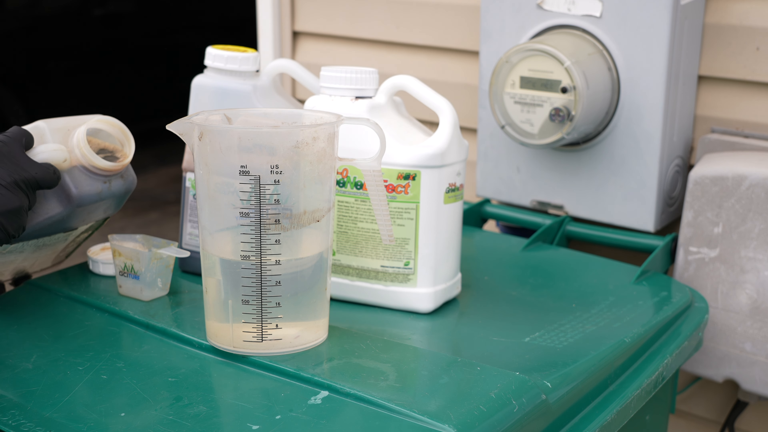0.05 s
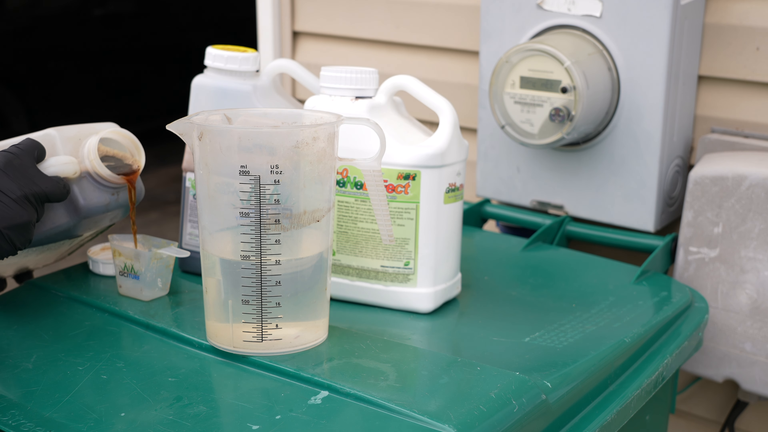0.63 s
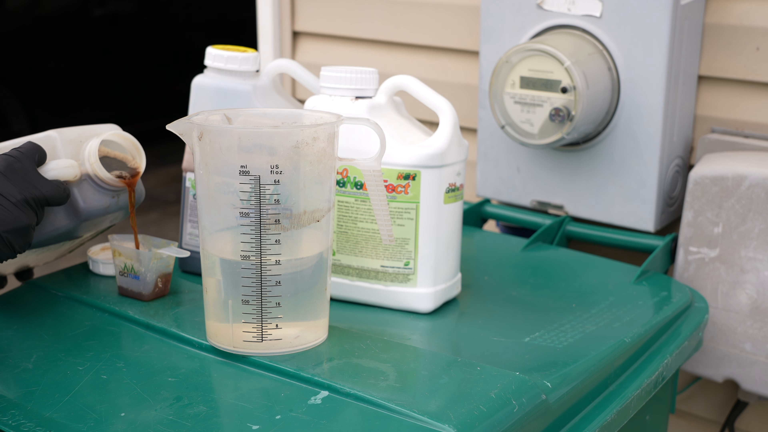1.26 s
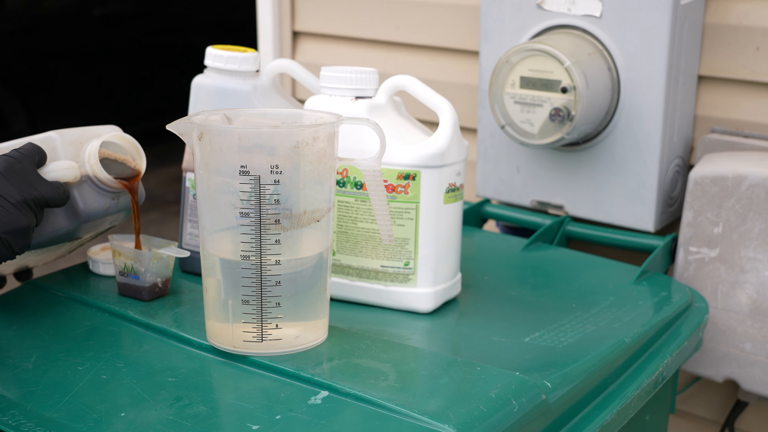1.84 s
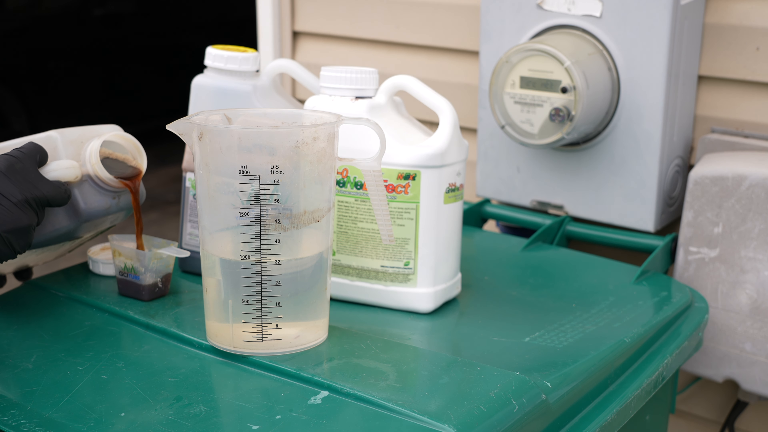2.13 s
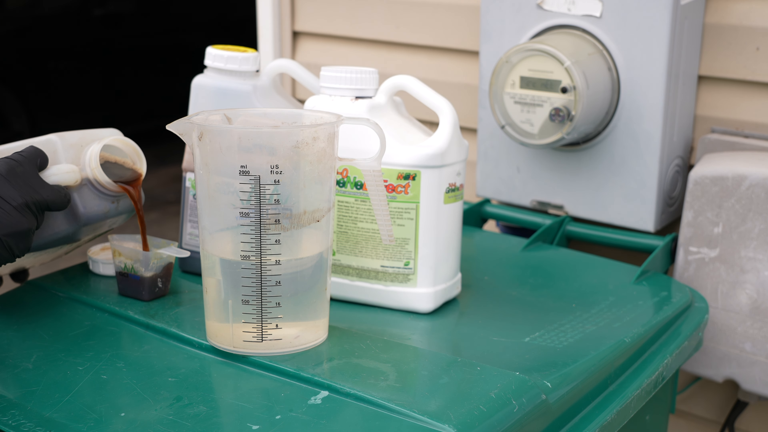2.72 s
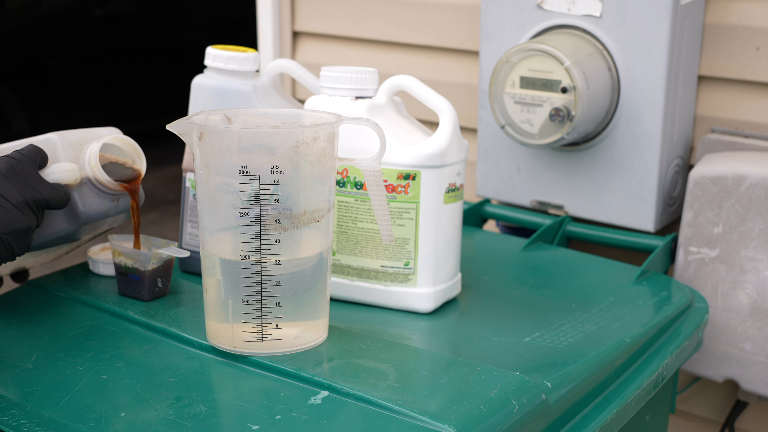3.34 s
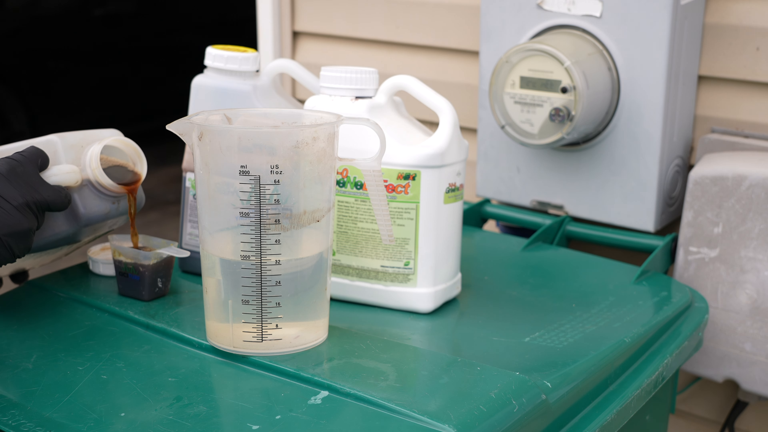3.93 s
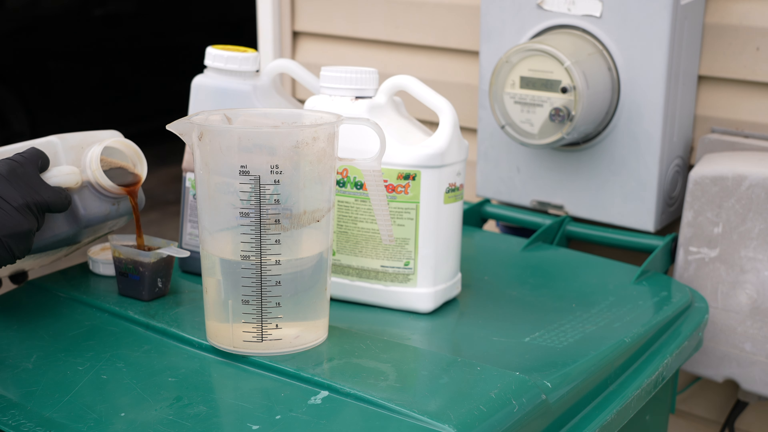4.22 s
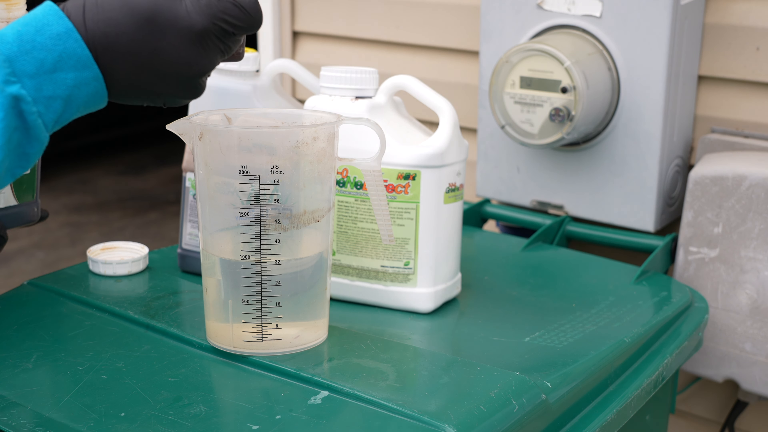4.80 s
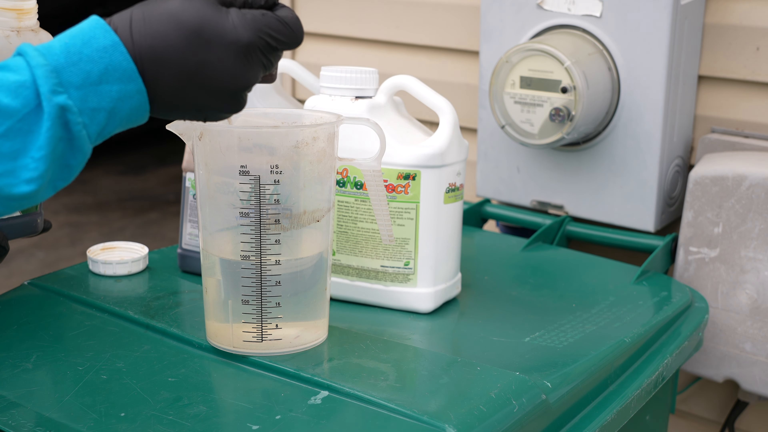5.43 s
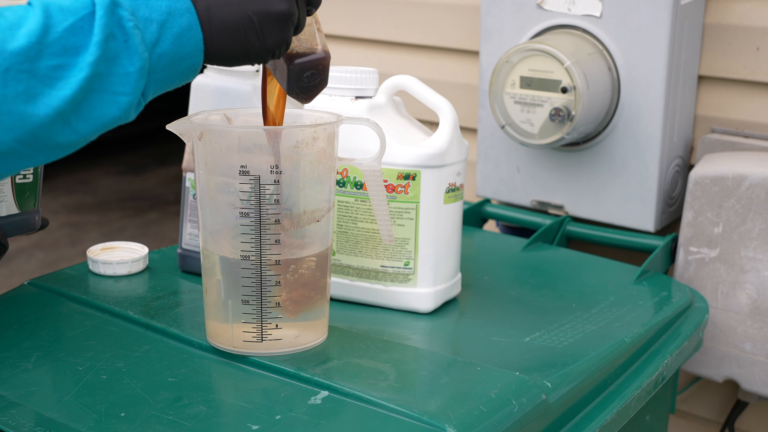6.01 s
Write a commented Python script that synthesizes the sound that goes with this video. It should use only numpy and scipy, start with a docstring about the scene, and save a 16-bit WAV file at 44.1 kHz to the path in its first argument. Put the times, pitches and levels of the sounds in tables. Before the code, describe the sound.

Close to the microphone, liquid runs from a bottle into a small plastic cup, splashing and bubbling at first, then trickling more quietly as the cup fills. Plastic knocks lightly a few times. The pour stops, and after a short pause the cupful is tipped into a jug of water with a plop and a brief splash. Outdoors, a machine hums low and wind rumbles on the microphone.

```python
"""Pouring into a plastic cup, outdoors

Close to the microphone, a dark liquid runs from a bottle into a small plastic cup on a bin lid.
The stream traps bubbles that ring the cup, splashing at first and quieter as it fills.
Then the cup is tipped into a jug of water, where a big air pocket closes with a plop.
A machine hums nearby and wind rumbles on the microphone."""
import sys
import numpy as np
from scipy import signal
from scipy.fft import rfft, irfft
from scipy.io import wavfile
from scipy.ndimage import uniform_filter1d

SR = 44100
rng = np.random.default_rng(int(sys.argv[2]) if len(sys.argv) > 2 else 0)


def wav_out(sig):
    """Save sig, one row per channel (or a flat mono array), as 16-bit PCM at SR to the path in sys.argv[1]."""
    wavfile.write(sys.argv[1], SR, np.round(np.clip(np.atleast_2d(sig).T, -1, 1) * 32767).astype(np.int16))


N = 271611
TIME = np.arange(N) / SR
TOP_HZ = 15900
DEEP_S = 2.01  # from here the liquid is deep enough to cushion the stream

# How hard the stream churns the cup. Each row: time in seconds, relative level in dB.
FLOW = [(1.11, -18), (1.15, -13), (1.3, -13), (1.35, -8), (1.49, -8), (1.63, -3), (1.71, -13), (1.83, -2.5),
        (1.89, -7), (1.98, -2.5), (2.25, -6), (2.65, -4.5), (3.05, -14.5), (3.5, -13), (3.9, -9.5),
        (4.15, -13.5), (4.47, -7), (4.53, -2.5), (4.63, -14)]
def trickle(sputter_db=4.0, wake_db=-30.5, cushion_db=-10, cushion_s=0.11):
    """Close up, bubbles ring the cup between deep glugs and fine spray; all sputter with the stream."""
    large = evened(in_cup(swarm(max_per_s=1400, hz=1618, octaves=.445, cycles=2.44, uneven_db=3.5)))
    small = evened(in_cup(swarm(max_per_s=1400, hz=3400, octaves=.38, cycles=1, uneven_db=4)))
    spray = swarm(max_per_s=500, hz=7600, octaves=.55, cycles=1, uneven_db=5.5)
    glugs = swarm(max_per_s=300, hz=874, octaves=.26, cycles=2.3, uneven_db=4)
    sputter = evened(gain_of(sputter_db * drift(70)))
    flow, pouring = level(FLOW), gate(FLOW[0][0], FLOW[-1][0])
    # each slap leaves a dying wake of bubbles
    wake = bursts([(s, 0, db + wake_db) for s, db, _, _ in SPLATS], attack_s=0.0012, release_s=0.039)
    cushion = gain_of(cushion_db * (1 + np.tanh((TIME - DEEP_S) / cushion_s)) / 2)
    glugs *= np.hypot(gain_of(-70) * flow ** 2.1 * pouring, gain_of(-9) * wake)
    large *= np.hypot(gain_of(-63) * flow, wake)
    small *= np.hypot(gain_of(-66) * flow ** 0.74 * pouring, gain_of(-26) * wake)
    spray *= np.hypot(gain_of(-71.5) * flow ** 0.44 * pouring, gain_of(3) * wake)
    return sputter * (glugs + large + small + cushion * spray)


def gurgle():
    """Rounder bubbles ring long enough to have a pitch; in deep liquid, fine ones crackle over them."""
    large = evened(in_cup(swarm(max_per_s=320, hz=1550, octaves=.55, cycles=4, uneven_db=3)))
    fine = evened(in_cup(swarm(max_per_s=380, hz=3300, octaves=.42, cycles=2.2, uneven_db=3.5)))
    flow, deep = level(FLOW), gate(DEEP_S, FLOW[-1][0])
    return gain_of(-62) * flow * large + gain_of(-69) * flow ** .6 * deep * fine


# The stream breaks up most in mid-pour. Each row: time in seconds, share of bubbles that form.
CHURN = [(1.2, 0.76), (1.9, 0.77), (2.6, 1), (3.1, 0.58), (4.6, 0.6), (5.9, 0.95)]
def swarm(max_per_s, hz, octaves, cycles, uneven_db, count=9000):
    """A crowd of bubbles of random size and pitch, which the flow feeds at an even power."""
    gaps, sizes = rng.exponential(1, (2, count))
    detunes, rings = rng.standard_normal((2, count))
    times = np.cumsum(gaps) / max_per_s
    pitches = hz * 2 ** (octaves * detunes)
    formed = (rng.random(count) < np.interp(times, *np.transpose(CHURN))) & (times < N / SR)
    out = np.zeros(N)
    for s, size, pitch, ring in np.transpose([times, sizes, pitches, rings])[formed]:
        if pitch < TOP_HZ:
            add(out, s, gain_of(uneven_db * min(size, 2.6)) * bubble(pitch, cycles * 2 ** (ring / 2)))
    power = abs(uniform_filter1d(out ** 2, size=SR // 12))
    return out / np.sqrt(power + 1e-9)


def bubble(hz, cycles):
    """A trapped bubble swells in a few cycles, rises a little in pitch and is cut short as it bursts."""
    swell_cycles = cycles + hz * 0.00052  # the tiniest bubbles ring for more cycles
    turns = np.arange(int(4 * swell_cycles / hz * SR) + 2) * hz / SR
    age = turns / swell_cycles
    envelope = age * np.exp((1 - age ** 2) / 2)
    return envelope * np.sin(2 * np.pi * turns * (1 + .004 * (age - 2)))


# The clearest bubbles at the microphone. Each row: start in seconds, peak level in dB, pitch in Hz.
BUBBLES = [(.784, -53, 6890), (0.875, -44, 3580), (0.959, -49.5, 4140), (1.034, -49, 3620),
           (1.134, -48.5, 4500), (1.173, -49, 3700), (1.194, -52, 1400), (1.21, -57, 3600),
           (1.233, -53.5, 3600), (1.292, -56, 1410), (1.331, -44.5, 1570), (1.341, -47, 1480),
           (1.353, -45.5, 1610), (1.357, -48, 5300), (1.388, -43.5, 1570), (1.391, -43, 3180),
           (1.426, -43, 3410), (1.52, -47, 1390), (1.528, -38.5, 1580), (1.571, -43.5, 1390),
           (1.584, -50, 1520), (1.606, -45, 1720), (1.614, -41.5, 1500), (1.662, -44.5, 1650),
           (1.687, -48.5, 3700), (1.759, -41.5, 1500), (1.762, -50.5, 1020), (1.797, -46, 1780),
           (1.811, -42.5, 1140), (1.816, -44, 945), (1.822, -40, 1590), (1.838, -51, 3480),
           (1.87, -45, 1380), (1.875, -42.5, 3100), (1.9, -49, 1450), (1.922, -43, 1450), (1.935, -52, 860),
           (1.978, -51, 770), (1.966, -49, 1450), (1.967, -51.5, 6140), (1.983, -39, 1800),
           (2.107, -41, 1850), (2.15, -47.5, 3230), (2.183, -44.5, 1510), (2.213, -46, 1460),
           (2.252, -45.5, 1850), (2.278, -50, 1790), (2.306, -45, 1610), (2.334, -40.5, 1770),
           (2.645, -43.5, 3400), (2.669, -48, 3400), (3.161, -52, 1760), (3.472, -55.5, 1070),
           (3.498, -55.5, 5960), (3.554, -51.5, 1800), (3.576, -52, 3820), (3.749, -49.5, 2260),
           (3.811, -51, 1880), (4.017, -51.5, 1520), (4.406, -50, 3340), (4.507, -46, 3170),
           (4.532, -54, 1520), (5.932, -52, 2810), (5.94, -45.5, 1720), (5.94, -48, 3050),
           (5.944, -39, 1900), (5.958, -50, 2670), (5.969, -50, 4040), (5.988, -53, 1590),
           (5.999, -52, 1590), (6.023, -47.5, 1700), (6.035, -49, 1770), (6.039, -48, 3530),
           (6.054, -49, 3660), (6.061, -50.5, 6600), (6.08, -53, 1690), (6.092, -61, 2640),
           (6.135, -54, 1620)]
def single_bubbles():
    """Single bubbles stand out of the trickle and ring the vessel."""
    out = np.zeros(N)
    for s, db, hz in BUBBLES:
        add(out, s, gain_of(db) * in_vessel(bubble(hz, cycles=1.94), s))
    return out


# The stream breaks and slaps the liquid.
# Each row: start in seconds, peak level in dB, middle pitch in Hz, spread of the shower in seconds.
SPLATS = [(0.955, -55.5, 7030, 0.0035), (0.983, -55.5, 4700, 0.0027), (0.996, -54.5, 5640, .006),
          (1.132, -50, 5570, .004), (1.143, -50.5, 4640, 0.0039), (1.195, -57.5, 5370, 0.011),
          (1.33, -43.5, 6020, .005), (1.385, -45, 4840, .004), (1.424, -45, 6580, 0.0017),
          (1.519, -42.5, 5920, 0.0054), (1.57, -43.5, 5000, 0.0043), (1.585, -52, 6100, 0.0025),
          (1.607, -56, 7000, 0.0078), (1.757, -43.5, 3700, .003), (1.779, -42, 6280, 0.0046),
          (1.81, -42, 3070, 0.0034), (1.849, -50.5, 3550, .004), (1.872, -46, 2680, 0.0031),
          (1.943, -46.5, 3600, 0.0031), (2.005, -46.5, 4050, 0.0029), (2.28, -47.5, 2950, 0.0035),
          (2.332, -46, 3170, .002), (2.464, -43.5, 3400, 0.0053), (2.509, -46.5, 2800, 0.003),
          (2.644, -45, 2060, 0.0028), (2.788, -45, 2630, 0.0029), (2.823, -50, 2920, .003),
          (2.863, -51.5, 3270, 0.0046), (2.95, -54, 2400, 0.0036), (3.167, -50.5, 3100, .004),
          (3.368, -56, 2550, 0.0047), (3.433, -51.5, 2290, 0.0042), (3.484, -52.5, 3320, .003),
          (3.585, -50.5, 3070, .004), (3.746, -54, 3550, 0.0021), (3.782, -53, 2470, 0.0057),
          (3.888, -55.5, 2340, .008), (4.381, -57, 3020, 0.0019), (4.503, -47, 2100, .003),
          (4.514, -52, 3150, .002), (4.561, -53, 2260, 0.0038), (4.617, -57, 2630, 0.0046),
          (6.151, -46.5, 4330, .0036)]
def splats():
    """Each slap throws a shower of droplets that rings the vessel."""
    out = np.zeros(N)
    for s, db, hz, spread_s in SPLATS:
        add(out, s, gain_of(db) * in_vessel(shower(hz, spread_s), s))
    return out


def shower(hz, spread_s, octaves=0.435, count=30):
    """A quickly thinning shower of droplets around one pitch."""
    out = np.zeros(SR // 20)
    delays = spread_s * rng.exponential(1, count)
    pitches = hz * 2 ** (octaves * rng.standard_normal(count))
    for delay, pitch in zip(delays, pitches):
        if pitch < TOP_HZ:
            add(out, delay, np.exp(-delay / spread_s / 2) * bubble(pitch, cycles=1.44))
    return out


def splutters(hz=2500, octaves=0.64, rise_octaves_per_s=0.13, count=64):
    """Once the liquid is deep, lesser splutters come at random, finer as the cup fills."""
    out = np.zeros(N)
    for k, (jitter, detune) in enumerate(rng.uniform(-1.1, 1, (count, 2))):
        s = np.interp(k + jitter, [-1, count], [DEEP_S, FLOW[-1][0]])
        db = -57 + 0.037 * np.interp(s, *np.transpose(FLOW))
        pitch = hz * 2 ** (octaves * detune + rise_octaves_per_s * (s - DEEP_S))
        add(out, s, gain_of(db) * in_vessel(shower(pitch, spread_s=.005, count=4), s))
    return out


def impacts(decay_s=0.0033):
    """Liquid striking liquid cracks briefly as it traps a bubble or throws a shower."""
    hits = [(s, db - 16) for s, db, _ in BUBBLES if s < GUSH[0][0]]
    hits += [(s, db - 10) for s, db, _, _ in SPLATS]
    out, t = np.zeros(N), np.arange(SR // 40) / SR
    grit = noise([(400, -8), (1400, 4.5), (4000, 0), (6000, -15), (15000, -14)])
    for s, db in hits:
        crack = np.roll(grit, -round(s * SR))[:len(t)] * np.exp(-t / decay_s)
        add(out, s, gain_of(db) * peaked(crack))
    return in_cup(out)


# Flung droplets. Each row: start in seconds, relative level in dB, pitch in Hz.
TICKS = [(.708, -54, 8600), (.737, -50.5, 9100), (.8, -53, 13500), (.811, -53, 9300), (0.87, -47, 12700),
         (.875, -53, 8040), (0.898, -51, 11400), (1.0067, -46.5, 8800), (1.041, -53, 11300),
         (1.1214, -52, 6350), (1.347, -42.5, 6500), (1.373, -49, 6800), (1.404, -57, 11200),
         (1.44, -51, 12200), (1.549, -48, 6500), (1.558, -48, 7500), (1.613, -51, 10000),
         (1.628, -49, 7600), (1.648, -57, 7500), (1.657, -51, 5800), (1.758, -47, 9500), (1.811, -48, 8100),
         (1.899, -47.5, 9000), (1.942, -43, 9000), (2.154, -55, 9450), (2.305, -54, 9280),
         (3.3895, -52.5, 12000), (3.688, -46, 13300), (3.982, -52, 10900), (4.047, -50.5, 11700),
         (4.335, -50.5, 9000), (4.398, -51.5, 8120)]
def ticks(decay_s=0.0015, width_hz=4000):
    """A droplet on dry plastic gives a tiny bright crack around its own pitch."""
    out, t = np.zeros(N), np.arange(SR // 60) / SR
    for s, db, hz in TICKS:
        crack = rng.standard_normal(len(t)) * np.exp(-t / decay_s)
        add(out, s, gain_of(db) * peaked(resonate(resonate(crack, hz, width_hz), hz, width_hz)))
    return gain_of(-3.5) * out


# The cup's resonances. Each row: pitch in Hz, width in Hz, gain in dB, fade in dB per second.
CUP_MODES = [(1090, 150, -1.5, 3.5), (1461, 150, 13.5, 20.5), (1752, 380, 7.5, 6), (3357, 370, 9, 12)]
def in_cup(x, s=TIME):
    """The cup colours a sound at time s, ringing less as the liquid rises."""
    filling_s = np.maximum(s - DEEP_S, 0)
    return x + sum(gain_of(db - fade * filling_s) * resonate(x, hz, width)
                   for hz, width, db, fade in CUP_MODES)


def in_vessel(x, s):
    """A short sound at time s rings the cup or, once the cup is tipped, the jug; peak 1."""
    x = np.pad(x, (0, SR // 25))
    return peaked(in_cup(x, s) if s < GUSH[0][0] else in_jug(x))


# Surges from the tipped cup. Each row: start in seconds, length in seconds, relative level in dB.
GUSH = [(5.922, 0.013, -56.5), (5.95, 0.016, -57), (6.016, 0.071, -58.5), (6.134, .04, -61)]
def gush():
    """The cupful falls into the jug as a dense, lumpy splash; fine spatter flies above."""
    splash = swarm(max_per_s=2000, hz=2200, octaves=.7, cycles=1.6, uneven_db=3.5, count=14000)
    spray = swarm(max_per_s=1400, hz=6800, octaves=.6, cycles=.5, uneven_db=4)
    surges = bursts(GUSH, attack_s=0.016, release_s=0.024)
    return (evened(in_jug(splash)) + gain_of(-10.5) * spray) * surges


# The air in the jug. Each row: pitch in Hz, width in Hz, gain in dB.
JUG_MODES = [(542, 37, 3), (716, 85, 4), (894, 42, -9), (1665, 31, 13), (2690, 62, 9), (3550, 320, 1),
             (3960, 110, 14.5)]
def in_jug(x):
    """The jug's air column rings with each splash; its notes waver as the surface heaves."""
    heave = 1 + 0.014 * drift(40)[:len(x)]
    return x + sum(gain_of(db) * resonate(x, hz * heave, width) for hz, width, db in JUG_MODES)


def plop(s=5.9688, start_hz=635, glide_s=0.0071, swell_s=0.0012, hold_s=0.019, ring_s=0.033):
    """A big air pocket closes and sinks onto the jug's lowest note, which rings on with a higher one."""
    out, t = np.zeros(N), np.arange(SR // 6) / SR
    low_hz, upper_hz = JUG_MODES[0][0], JUG_MODES[2][0]
    hz = low_hz + (start_hz - low_hz) * np.exp(-t / glide_s)
    tail = np.exp(-t / ring_s)
    body = (np.exp(-(t / hold_s) ** 2) + gain_of(-12) * tail) * np.sin(2 * np.pi * np.cumsum(hz) / SR)
    upper = gain_of(-22) * tail * np.sin(2 * np.pi * upper_hz * t)
    add(out, s, gain_of(-36.5) * (1 - np.exp(-t / swell_s)) * (body + upper))
    return out


# Cup and bin lid ring together. Each row: pitch in Hz, relative level in dB, seconds to fall 60 dB.
PLASTIC_MODES = [(160, -11, 0.057), (473, -10.5, 0.07), (727, -16, 0.13), (897, -6, 0.025),
                 (1034, -4.5, 0.054), (1142, -2.5, 0.06), (1530, 5.5, 0.014), (2450, -8, 0.035),
                 (3490, -6, 0.027), (3360, 3, 0.032), (4554, 4, 0.018)]
# Plastic bumps on plastic. Each row: start in seconds, peak level in dB, brightness in Hz.
KNOCKS = [(0.707, -44, 1800), (0.941, -60, 220), (1.425, -43, 1300), (1.81, -41, 2200),
          (3.8406, -36.5, 3200), (3.8455, -41, 1000), (3.866, -47.5, 900), (4.627, -50.5, 4500),
          (5.939, -43, 700)]
def knocks(attack_s=0.00021, crack_s=0.0024):
    """Soft bumps wake only the low modes of the plastic, hard ones all of them, with a dry crack."""
    out, t = np.zeros(N), np.arange(SR // 5) / SR
    grit = noise([(100, -14), (500, 0.5), (1200, 8), (2200, -8), (4500, 6.5), (6000, -20), (15000, -1)])
    for s, db, bright_hz in KNOCKS:
        ring = np.zeros(len(t))
        for hz, mode_db, t60 in PLASTIC_MODES:
            envelope = gain_of(mode_db - 60 * t / t60) / (1 + (hz / bright_hz) ** 2)
            ring += envelope * np.sin(2 * np.pi * (hz * t + rng.random()))
        lowpass = signal.butter(1, bright_hz, fs=SR)
        crack = signal.lfilter(*lowpass, grit[round(s * SR):][:len(t)]) * np.exp(-t / crack_s)
        knock = (evened(ring) + gain_of(-0.5) * evened(crack)) * (1 - np.exp(-t / attack_s))
        add(out, s, gain_of(db) * peaked(knock))
    return out


# The bottle's neck rubs on the cup. Each row: start in seconds, length in seconds, relative level in dB.
RUBS = [(.7, 0.019, -59.5), (.83, 0.11, -62), (1.37, 0.097, -58)]
def rub():
    """Dragging plastic scrapes softly in the lid's lowest modes; the stream drums faintly on them too."""
    scrape = noise([(50, -16.5), (105, 7), (165, -6.5), (260, -14.5), (480, -16), (800, -41), (3000, -51)])
    ring = sum(resonate(scrape, hz, 3 / t60) for hz, _, t60 in PLASTIC_MODES[:2])
    drive = bursts(RUBS, attack_s=0.022, release_s=0.089) + gain_of(-70) * level(FLOW)
    return gain_of(6) * evened(scrape + gain_of(-12.5) * ring) * drive


def echoes(x, t60=0.017, delay_s=.003):
    """A short scatter of echoes reaches the microphone from the containers and the house wall."""
    t = np.arange(SR // 5) / SR
    taps = rng.standard_normal(len(t)) * (rng.random(len(t)) < .06)
    taps *= (t > delay_s) * gain_of(-60 * t / t60)
    return signal.fftconvolve(x, taps / np.linalg.norm(taps))[:N]


# The machine's steady tones. Each row: pitch in Hz, rms level in dB.
HUM = [(40, -60.5), (59.6, -57), (80.6, -65), (141, -79), (165, -76)]
# Its drone. Each row: time in seconds, rms level in dB of the low tone, then of the one an octave up.
DRONE = [(0, -74, -81), (.6, -61, -83), (2.2, -73, -80.5), (2.9, -69, -78), (4.2, -61, -101),
         (4.7, -78, -74.5), (5.1, -73, -73.5), (5.35, -57, -76.5), (5.55, -68.5, -70.5), (5.7, -57.5, -75),
         (6.16, -55, -75.5)]
def machine():
    """A machine nearby hums steadily under a drone that swells and fades."""
    hum = sum(gain_of(db) * tone(hz) for hz, db in HUM)
    return hum + tone(122, waver_db=3.5) * level(DRONE) + tone(246) * level(DRONE, column=2)


def tone(hz, waver_hz=0.63, waver_db=2.03):
    """One gently wavering tone of the machine, rms 1."""
    turns = np.cumsum(hz + waver_hz * drift(3.047)) / SR + rng.random()
    return evened(np.sin(2 * np.pi * turns) * gain_of(waver_db * drift(5)))


# Spectra of slow gusts and of quicker eddies. Each row: frequency in Hz, relative level in dB.
GUST_SPECTRUM = [(5, -5), (15, 5.5), (28, 2), (42, -12), (70, -28), (150, -25), (400, -59), (3000, -110)]
EDDY_SPECTRUM = [(10, -24), (32, -2.5), (52, 4), (72, -4.5), (100, -13.5), (170, -30.5), (300, -46.5),
                 (800, -69), (3000, -110)]
# Wind at the microphone. Each row: time in seconds, level in dB, share of eddies from 0 to 1.
WIND = [(0, -50, 0.26), (.22, -44, 0.68), (0.449, -47, 0), (.6, -56.5, 1), (1.28, -56.5, 0.95),
        (1.42, -42.5, 0.12), (1.65, -43.5, 0.01), (1.9, -47.5, 0.4), (2.05, -38.5, 0.09),
        (2.25, -51.5, 0.5), (2.4, -39.5, 0.35), (2.55, -38.5, 0.64), (2.7, -47.5, 0.28),
        (2.97, -42.5, 0.64), (3.7, -53.5, 0.73), (4.5, -50, 0.47), (4.75, -78, 0.4), (6.16, -64, 0.4)]
# One lone puff of air. Its row: start in seconds, length in seconds, level in dB.
PUFF = [(5.56, 0.055, -44)]
def wind():
    """Gusts and eddies rumble right on the microphone."""
    times, _, shares = np.transpose(WIND)
    share = np.interp(TIME, times, shares)
    rumble = np.sqrt(1 - share) * noise(GUST_SPECTRUM) + np.sqrt(share) * noise(EDDY_SPECTRUM)
    puff = noise(GUST_SPECTRUM) * bursts(PUFF, attack_s=0.025, release_s=0.034)
    return rumble * level(WIND) + puff


# The outdoor background. Each row: frequency in Hz, relative level in dB.
AIR_SPECTRUM = [(20, -3), (110, 1), (190, -7), (300, -12), (450, -14.5), (800, -16.5), (1500, -21),
                (2500, -26), (4000, -27), (5000, -32.5), (7000, -34.5), (15500, -34.5)]
def open_air():
    """A steady hiss from far off."""
    return gain_of(-62.5) * noise(AIR_SPECTRUM)


def gain_of(db):
    """Decibels to amplitude."""
    return 10 ** (np.asarray(db) / 20)


def evened(x):
    """Scales to rms 1."""
    return x / np.sqrt(np.mean(x ** 2) + 1e-20)


def peaked(x):
    """Scales to peak 1."""
    return x / abs(x).max()


def level(rows, column=1):
    """Gain over time from one dB column of a curve, fading quickly beyond its ends."""
    rows = np.array(rows)
    beyond_s = abs(TIME - np.clip(TIME, rows[0, 0], rows[-1, 0]))
    return gain_of(np.interp(TIME, rows[:, 0], rows[:, column])) * np.exp(-beyond_s / .02)


def gate(start_s, end_s):
    """Gain 1 between two times, fading quickly outside them."""
    return level([(start_s, 0), (end_s, 0)])


def bursts(rows, attack_s, release_s):
    """Gain over time for sounds that each rise, hold and die away."""
    return sum(gain_of(db) * np.clip((TIME - s) / attack_s, 0, 1)
               * np.exp(-np.maximum(TIME - s - length, 0) / release_s) for s, length, db in rows)


def add(mix, s, sound):
    """Mixes a sound in at s seconds."""
    part = mix[max(round(s * SR), 0):][:len(sound)]
    part += sound[:len(part)]


def noise(spectrum):
    """Noise of rms 1 shaped by (Hz, dB) points."""
    hz, db = np.transpose(spectrum)
    shape_db = np.interp(np.log(np.fft.rfftfreq(N, 1 / SR) + 1), np.log(hz + 1), db)
    return evened(irfft(rfft(rng.standard_normal(N)) * gain_of(shape_db), N))


def drift(top_hz):
    """A slow random wander of rms about 1."""
    t = np.linspace(0, N / SR, 1500)
    rates = np.geomspace(top_hz / 10, top_hz, 20)
    wander = sum(np.sin(2 * np.pi * (hz * t + rng.random())) / np.sqrt(hz) for hz in rates)
    return np.interp(TIME, t, evened(wander))


def resonate(x, hz, width_hz):
    """A resonance of gain 1 whose pitch may move."""
    turn = np.exp(2j * np.pi * np.cumsum(hz * np.ones(len(x))) / SR)
    pole = np.exp(-np.pi * width_hz / SR)
    return 2 * (turn * signal.lfilter([1 - pole], [1, -pole], x / turn + 1e-18)).real


def scene():
    """One microphone: the pour and its echoes in front, the outdoor background around it."""
    background = machine() + wind() + open_air()
    pour = trickle() + gurgle() + single_bubbles() + splutters() + splats() + impacts() + ticks()
    foreground = pour + knocks() + rub() + gush() + plop()
    return (background + foreground + gain_of(-9.5) * echoes(foreground))[None]


def record(dry):
    """A steep low-pass cuts the treble above TOP_HZ."""
    lowpass = signal.firwin(511, TOP_HZ, window=("kaiser", 9), fs=SR)
    return signal.oaconvolve(dry, lowpass[None], "same")


dry = scene()
out = record(dry)
wav_out(out)
```